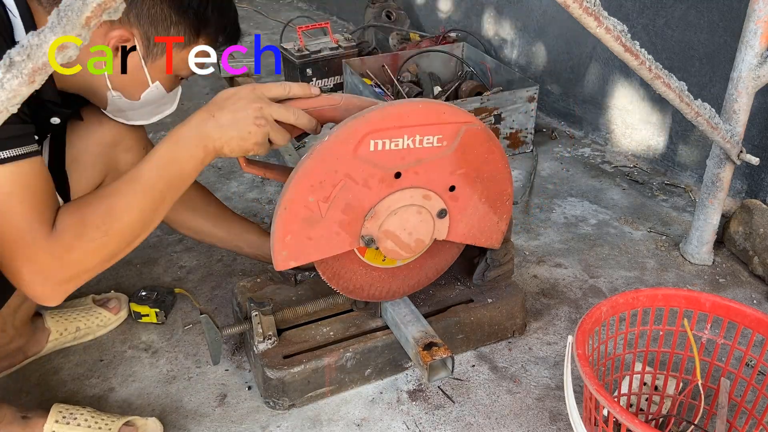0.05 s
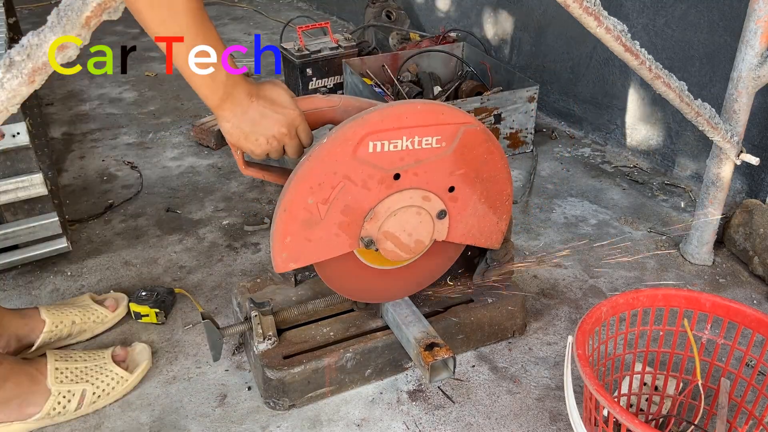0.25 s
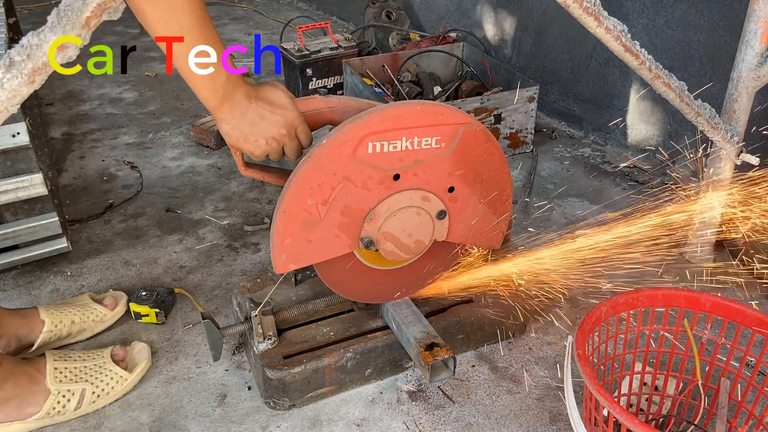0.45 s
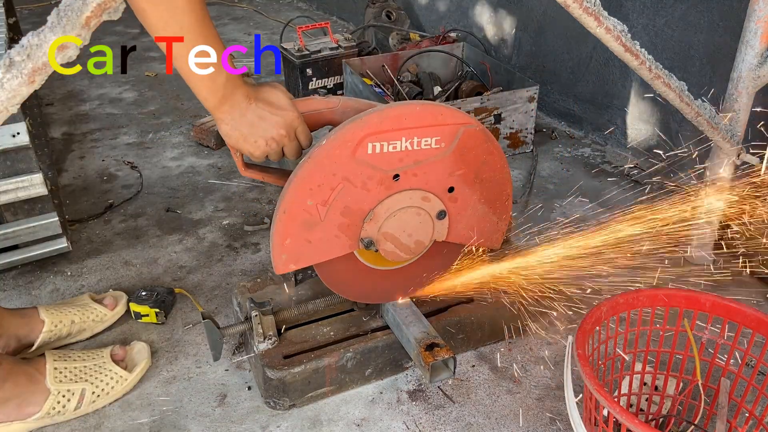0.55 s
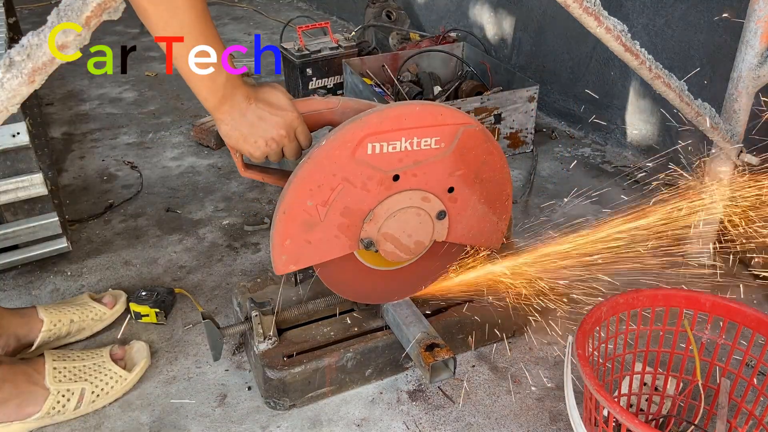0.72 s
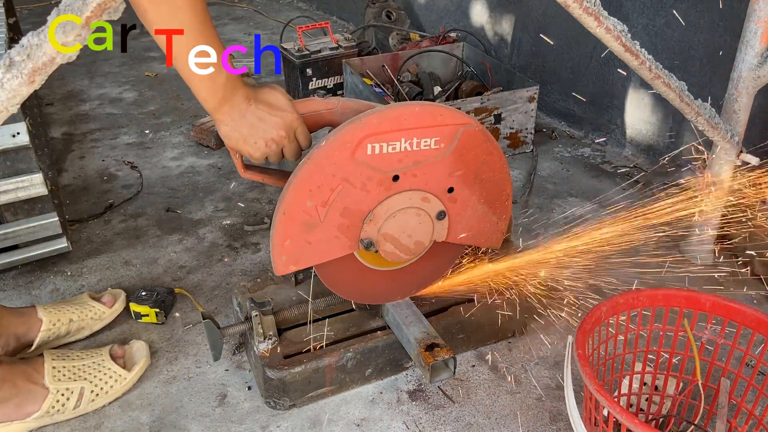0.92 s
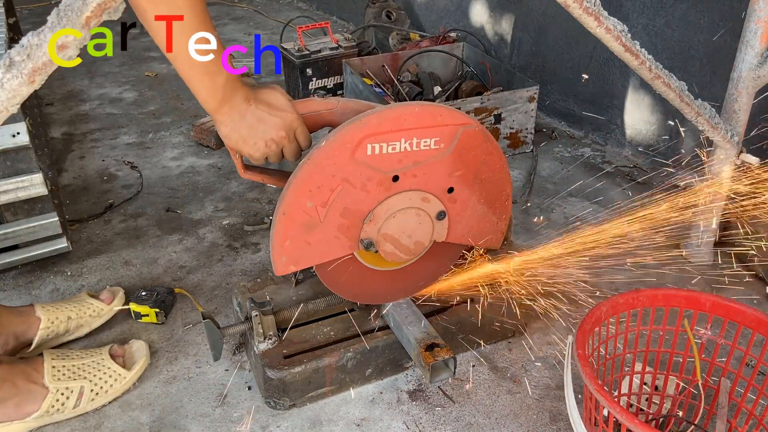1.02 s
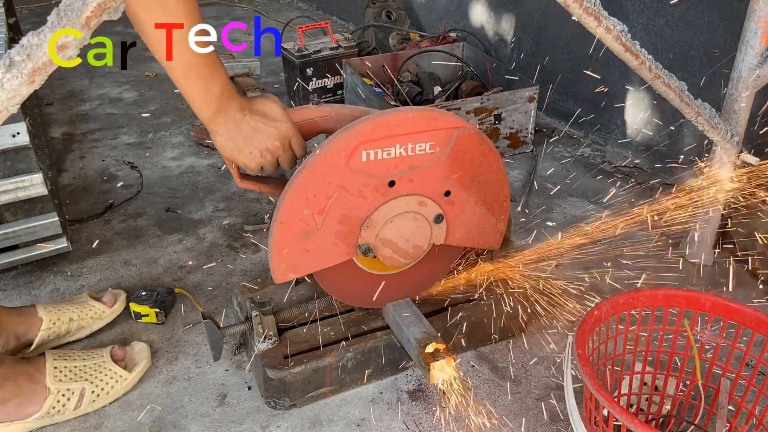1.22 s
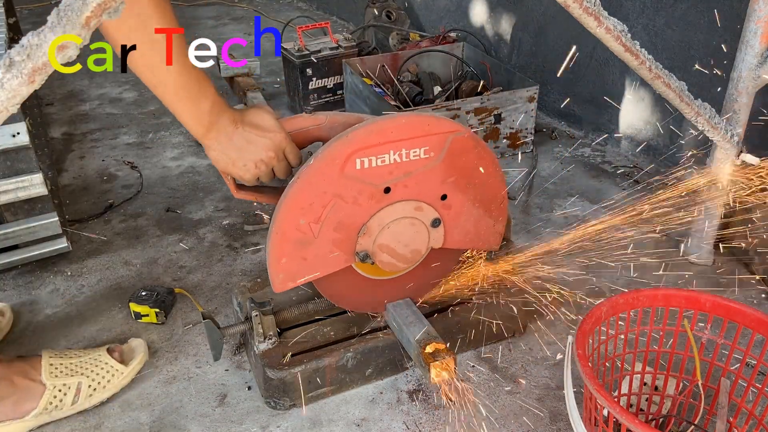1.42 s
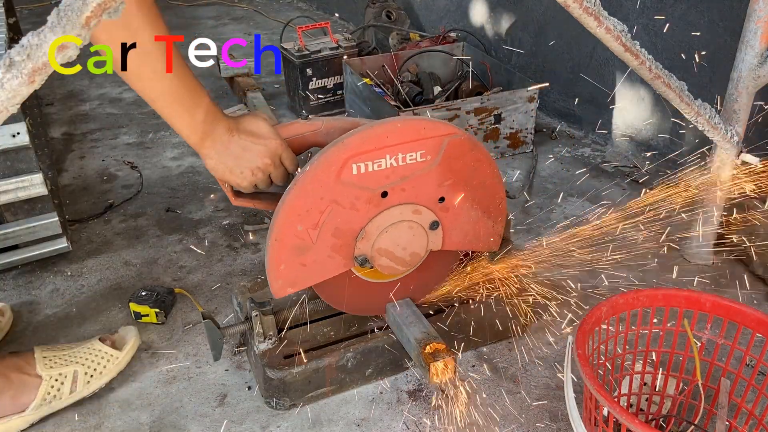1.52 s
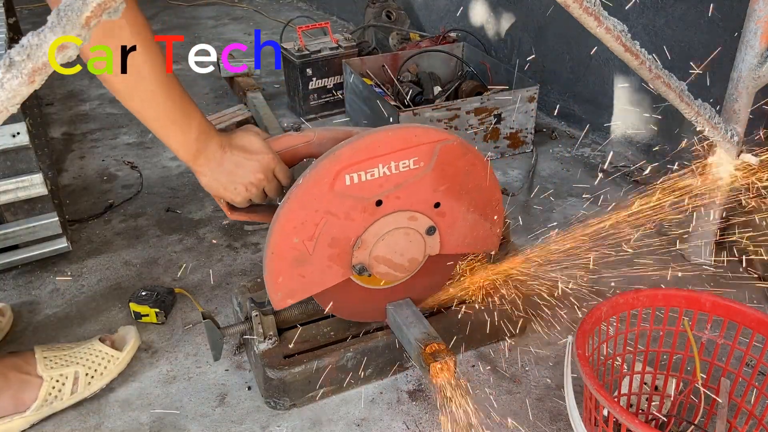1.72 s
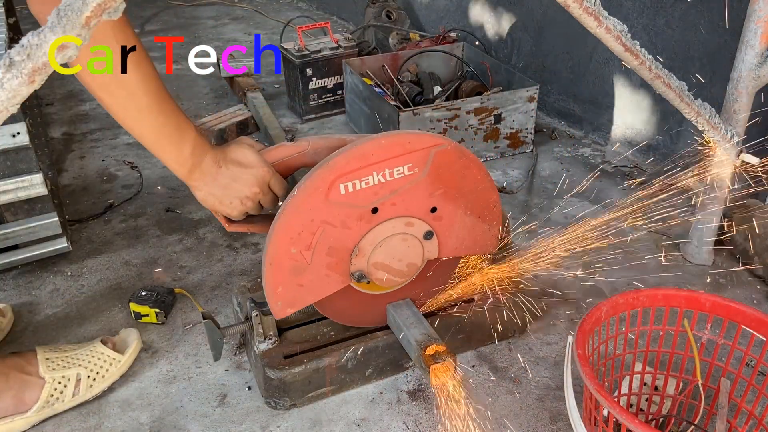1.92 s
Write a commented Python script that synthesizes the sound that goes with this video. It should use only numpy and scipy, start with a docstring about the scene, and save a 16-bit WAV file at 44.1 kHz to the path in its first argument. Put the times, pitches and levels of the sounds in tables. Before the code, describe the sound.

A cut-off saw grinds a steel tube close by in a workshop. After a faint clank, the wheel lands with a rattling bang at 0.2 seconds, then rasps and hisses over a wavering motor buzz and whine. Short squeals come around 0.5 seconds, and the wheel chatters from about 0.9 to 1.2. The cut then continues thinner and quieter, with high squeals and two brief low swells.

```python
"""An abrasive cut-off saw bites into a clamped steel tube on a workshop floor.
After a faint clank the wheel lands with a rattling bang, then grinds: grit hisses and rings the tube.
The drive buzzes and whines at a pitch that sags under load; the wheel squeals in the slot and
chatters near 1 s. A low rumble swells twice. Once the top wall is through, the cut is thinner and quieter."""
import sys
import numpy as np
from scipy import signal
from scipy.fft import rfft, irfft
from scipy.io import wavfile

SR = 44100
rng = np.random.default_rng(int(sys.argv[2]) if len(sys.argv) > 2 else 0)


def wav_out(sig):
    """Save sig, one row per channel (or a flat mono array), as 16-bit PCM at SR to the path in sys.argv[1]."""
    wavfile.write(sys.argv[1], SR, np.round(np.clip(np.atleast_2d(sig).T, -1, 1) * 32767).astype(np.int16))


N = 85995
TIME_S = np.arange(N) / SR
BINS_HZ = np.maximum(np.arange(N // 2 + 1) * SR / N, 1)

# stereo width (frequency [Hz], side gain [dB])
SIDE_SPECTRUM = [(60, -20), (250, -21.5), (500, -16.5), (1000, -12), (2000, -6.5), (4000, -9), (8000, -6.5),
                 (14000, -7.5)]
# workshop noise (frequency [Hz], gain [dB])
SHOP_SPECTRUM = [(18, -63), (30, -30), (189, -6.5), (404, -5.5), (473, -16), (584, -2.5), (760, -18.5),
                 (844, -8), (1070, -15), (4080, -21), (16000, -31.5)]
# crack of a blow (frequency [Hz], gain [dB])
CRACK_SPECTRUM = [(30, -48), (120, -46), (350, -19), (700, -11.5), (1500, -3.5), (2700, 2), (5200, -12.5),
                  (7500, -7), (10000, -10), (16000, -18)]
# modes of tube and saw frame (frequency [Hz], bandwidth [Hz], gain [dB])
TUBE_MODES = [(752, 25, -9), (950, 44, -8), (1394, 32, -1), (1855, 150, -5), (1932, 210, -1.5),
              (2593, 97, -0.5), (2789, 102, 0), (2953, 74, -5), (3315, 61, 0), (4150, 330, -9),
              (4790, 220, -2.5), (5180, 45, 0), (5640, 270, -4), (7520, 180, -6)]
# blows of the landing wheel (time [s], relative level [dB])
LANDING_BLOWS = [(0.2015, -4), (0.2026, 3.5), (.2049, -3), (0.2084, -1), (0.2096, 0), (0.2122, -4),
                 (0.219, -14), (0.2209, -1.5), (0.2264, -17), (0.2317, -15), (0.2385, -4), (.2545, -26)]
# drive knocking the wheel on the tube (time [s], rate [Hz])
KNOCK_RATE = [(.2, 191.3), (.3, 194.8), (.385, 206.3), (.45, 205.6), (.55, 197.6), (.66, 195.9),
              (.8, 192.8), (.89, 195.5), (1.03, 199.8), (1.1, 200.2), (1.2, 198.1), (1.28, 189.9),
              (1.364, 198.2), (1.45, 203.1), (1.61, 194.6), (1.7, 196.3), (1.95, 177.8)]
# rasp and ring (time [s], relative level [dB])
GRIND_ENVELOPE = [(0.25, -24), (0.268, -24), (0.32, -26.5), (0.362, -25.5), (0.406, -29.5), (0.632, -31),
                  (0.646, -32), (0.856, -30.5), (0.874, -37), (0.908, -26.5), (0.94, -34.5), (1.092, -32.5),
                  (1.304, -38.5), (1.32, -37), (1.376, -43.5), (1.542, -43.5), (1.664, -45), (1.95, -39)]
# rasp (frequency [Hz], gain [dB])
RASP_SPECTRUM = [(150, -30), (330, -22), (700, -12), (1050, -17), (1400, -1.5), (2800, -3.5), (4000, -0.5),
                 (5000, 5), (5700, 0), (6400, -5), (9000, -4)]
# treble hiss (time [s], relative level [dB])
HISS_ENVELOPE = [(0.25, -53), (0.272, -50), (0.286, -27), (0.42, -32.5), (0.466, -34), (0.95, -35),
                 (1.12, -33), (1.428, -39), (1.5, -37), (1.95, -38)]
# treble hiss (frequency [Hz], gain [dB])
HISS_SPECTRUM = [(3000, -49.5), (6000, -11), (7300, -5.5), (8500, -3), (9500, 0.5), (10800, -0.5),
                 (13000, -6), (14300, 3), (15700, 0)]
# rumble under the cut (time [s], relative level [dB])
RUMBLE_ENVELOPE = [(.2, -57), (.25, -59), (.33, -44.5), (.45, -64.5), (.95, -64.5), (1.18, -54),
                   (1.27, -47), (1.33, -42.5), (1.38, -50), (1.46, -51), (1.56, -50), (1.63, -51),
                   (1.8, -57), (1.95, -68)]
# rumble under the cut (frequency [Hz], gain [dB])
RUMBLE_SPECTRUM = [(25, -50), (100, -28), (150, -15), (190, -9.5), (260, -9.5), (450, -7.5), (700, -9),
                   (1500, -22.5)]
# motor hum at twice the knock rate (time [s], level [dB])
HUM_ENVELOPE = [(.2, -37), (.22, -41), (.25, -53.5), (.35, -51.5), (.45, -56), (.8, -54.5), (1.18, -53.5),
                (1.25, -78), (1.5, -60), (1.57, -56.5), (1.64, -73), (1.95, -82)]
# drone at the knock rate (time [s], level [dB])
DRONE_ENVELOPE = [(.2, -66), (.45, -75), (.85, -73), (1.2, -72), (1.265, -49), (1.34, -68), (1.48, -67.5),
                  (1.565, -49), (1.63, -75), (1.95, -88)]
# drive buzz (time [s], level [dB])
BUZZ_ENVELOPE = [(.25, -43), (.4, -38.5), (.5, -34), (.62, -33), (.76, -36.5), (.92, -35), (1.2, -39),
                 (1.31, -43), (1.37, -48), (1.55, -50), (1.7, -50.5), (1.95, -61)]
# drive harmonics (multiple of knock rate, weight in buzz [dB], weight in chatter [dB])
HARMONICS = [(3, -18, -21), (4, -10, -14), (5, -15.5, -18), (6, -5.5, -17), (7, -5.5, -8.5), (8, -5, -3.5),
             (9, -1.5, -13), (10, -2.5, -1), (11, -4, -12), (12, -7.5, -4.5), (13, -3.5, 2), (14, 1.5, -33),
             (15, -12, -5), (16, -2, -9), (17, -7, 5), (19, -5, -5), (23, -16, -3.5), (24, -2, -20),
             (28, 0.5, 1), (30, -4.5, -2), (34, -11, -6.5), (39, -31, -5)]
# wheel resonances (frequency [Hz], bandwidth [Hz], gain [dB])
WHEEL_MODES = [(9070, 730, 5.5), (10200, 280, 13), (11730, 200, 8.5), (13340, 130, -14.5)]
# high partials (time [s], level re HISS_ENVELOPE [dB])
SINGING_ENVELOPE = [(.25, -13), (.4, -9), (.8, -10), (1.2, -4.5), (1.45, -9.5), (1.95, -6.5)]
# whines, silent where start > end (start [s], end [s], multiple of knock rate, level [dB])
WHINE_SPELLS = [(0.32, 1.1, 49, -42), (.98, 1.21, 49, -39.5), (.68, 0.83, 48, -42.5),
                (.34, 0.46, 70, -35.5), (0.657, 0.96, 74, -41), (1.0, 1.3, 71, -46),
                (1.47, 1.558, 57.5, -42), (1.1, 1.9, 68, -52), (2.1, 1.88, 76, -59), (2.4, 1.97, 73, -52),
                (1.6, 1.8, 28, -50.5), (1.17, 1.29, 4, -50)]
# wheel squeals (start [s], end [s], frequency [Hz], level [dB])
SQUEAL_SPELLS = [(0.471, 0.489, 2650, -31), (0.543, .63, 2580, -38.5), (0.614, 0.64, 2760, -30),
                 (1.236, 1.27, 10050, -44), (1.31, 1.339, 2700, -42), (1.37, 1.422, 11540, -45),
                 (1.524, 1.551, 2600, -47.5), (1.526, 1.706, 10000, -44.5), (1.845, 1.872, 9950, -41),
                 (1.919, 1.97, 10130, -58)]
# low swells (start [s], end [s], level [dB])
SWELL_SPELLS = [(1.206, 1.274, -45), (1.483, 1.577, -46.5)]
# low swells (frequency [Hz], gain [dB])
SWELL_SPECTRUM = [(25, -40), (70, -20), (130, -11), (200, 2), (450, 0), (900, -3.5), (1800, -5),
                  (4000, -35)]

BITE_S, BITE_RISE_S = 0.202, 0.004
CHATTER_START_S, CHATTER_END_S, CHATTER_FADE_S = 0.94, 1.208, 0.15
FLUTTER_HZ, JITTER_HZ, WANDER_HZ = 40, 36.9, 21


def from_db(db):
    """Decibels to gain."""
    return 10 ** (np.asarray(db) / 20)


def unit_rms(x):
    """Scale to unit rms."""
    return x / np.sqrt(np.mean(x ** 2) + 1e-20)


def curve(rows):
    """Interpolate (time [s], value) rows."""
    return np.interp(TIME_S, *np.transpose(rows))


def shape(x, spectrum):
    """Filter by (frequency [Hz], gain [dB]) rows."""
    hz, db = np.transpose(spectrum)
    return irfft(rfft(x) * from_db(np.interp(np.log(BINS_HZ), np.log(hz), db)), N)


def noise(spectrum):
    """Two independent shaped noises."""
    return unit_rms(shape(rng.standard_normal((2, N)), spectrum))


def drift(corner_hz, points=2048):
    """Slow random signal, rms about 1."""
    rolloff = 1 + (BINS_HZ[:points // 2 + 1] / corner_hz) ** 2
    slow = irfft(rfft(rng.standard_normal(points)) / rolloff)
    return np.interp(TIME_S, np.linspace(0, TIME_S[-1], points), unit_rms(slow))


def gate(start_s, end_s, fade_s=0.026):
    """Fade in, hold, fade out."""
    return np.clip((TIME_S - start_s) / fade_s + .5, 0, 1) * np.clip((end_s - TIME_S) / fade_s + .5, 0, 1)


def partial(cycles, wander_db):
    """Pair: a sine of wandering level, and its wavering reflection."""
    phase = 2 * np.pi * (cycles + rng.random())
    direct = unit_rms(from_db(wander_db * np.minimum(drift(WANDER_HZ), 1)) * np.sin(phase))
    reflection = drift(WANDER_HZ) * np.sin(phase) + drift(WANDER_HZ) * np.cos(phase)
    return np.array([direct, reflection])


def stereo(pair, room_db):
    """Direct sound to mid, room sound to side."""
    direct, room = pair
    side = from_db(room_db) * shape(room, SIDE_SPECTRUM)
    return np.array([direct + side, direct - side])


def tube(force):
    """Tube and frame ring as parallel resonators of alternating sign."""
    ring = 0
    for k, (hz, width_hz, db) in enumerate(TUBE_MODES):
        radius = np.exp(-np.pi * width_hz / SR)
        b = (1 - radius ** 2) / 2 * np.array([1, 0, -1])
        a = [1, -2 * radius * np.cos(2 * np.pi * hz / SR), radius ** 2]
        ring += (-1) ** k * from_db(db) * signal.lfilter(b, a, force + 1e-18)
    return ring


def workshop(clank_db=-31, decay_s=0.018, ambience_db=-43):
    """Before the cut: a dying clank and dull room noise."""
    metal = unit_rms(noise(CRACK_SPECTRUM) + unit_rms(tube(rng.standard_normal((2, N)))))
    clank = from_db(clank_db) * np.exp(-TIME_S / decay_s) * metal
    return clank + from_db(ambience_db) * noise(SHOP_SPECTRUM) * gate(-1, BITE_S)


def landing():
    """The wheel bounces on the tube: each blow cracks, rings the metal and leaves a room tail."""
    times_s, levels_db = np.transpose(LANDING_BLOWS)
    blows = np.zeros(N)
    blows[(times_s * SR).astype(int)] = from_db(levels_db)

    def bursts(decay_s):
        pole = np.exp(-2 / (decay_s * SR))
        power = signal.lfilter([1 - pole], [1, -pole], blows ** 2 + 1e-18)
        return noise(CRACK_SPECTRUM) * np.sqrt(power)

    ring = from_db(17.5) * tube(np.array([blows, blows * rng.choice([-1, 1], N)]))
    crack = from_db(-4.5) * bursts(decay_s=0.0024)
    tail = from_db(-0.5) * bursts(decay_s=0.038)
    return crack + ring + tail


def rumble():
    """Low noise under the cut."""
    return from_db(curve(RUMBLE_ENVELOPE) - 5.5) * noise(RUMBLE_SPECTRUM)


def grit(cycles, grains_per_s=14000, spread_db=2.5, beat_depth=0.33, flutter_db=1.36):
    """Abrasive grains strike at random, harder on each motor beat."""
    sizes = from_db(spread_db * np.minimum(rng.exponential(1, (2, N)), 5))
    signs = rng.choice([-1, 1], (2, N))
    strikes = rng.random((2, N)) < grains_per_s / SR
    beat = 1 + beat_depth * (np.cos(4 * np.pi * cycles) + .5 * np.cos(2 * np.pi * cycles))
    return sizes * signs * strikes * beat * from_db(flutter_db * drift(FLUTTER_HZ))


def reflect(pair, decay_s=0.02):
    """Floor and walls add a short wash of reflections."""
    wash = rng.standard_normal((2, N)) * np.exp(-TIME_S / decay_s)
    wash /= np.sqrt(np.sum(wash ** 2, axis=1, keepdims=True))
    return pair + signal.fftconvolve(pair, wash, axes=1)[:, :N]


def grinding(cycles):
    """Grit rasps, rings the tube and hisses."""
    rasp = from_db(-3.5) * unit_rms(shape(reflect(grit(cycles)), RASP_SPECTRUM))
    ring = from_db(-6.5) * unit_rms(tube(grit(cycles)))
    hiss = from_db(-2.54) * unit_rms(shape(reflect(grit(cycles)), HISS_SPECTRUM))
    return from_db(curve(GRIND_ENVELOPE)) * (rasp + ring) + from_db(curve(HISS_ENVELOPE)) * hiss


def drive(cycles, roughness=0.26):
    """Hum, drone, buzz and whine follow motor speed; the buzz gives way during chatter."""
    hum = from_db(curve(HUM_ENVELOPE)) * partial(2 * cycles, wander_db=3)
    drone = from_db(curve(DRONE_ENVELOPE)) * partial(cycles, wander_db=6.5)
    buzz = sum(from_db(db) * partial(k * cycles, wander_db=5.5) * (1 + roughness * drift(FLUTTER_HZ))
               for k, db, _ in HARMONICS)
    duck = 1 - gate(CHATTER_START_S, CHATTER_END_S, CHATTER_FADE_S)
    whine = sum(from_db(db) * gate(start_s, end_s) * partial(k * cycles, wander_db=1)
                for start_s, end_s, k, db in WHINE_SPELLS)
    return hum + drone + from_db(curve(BUZZ_ENVELOPE)) * duck * unit_rms(buzz) + whine


def singing(cycles):
    """High drive partials glide through the wheel's resonances."""
    tones, knock_hz = 0, curve(KNOCK_RATE)
    for k in range(32, 82):
        gain_db = sum(db / (1 + (2 * (k * knock_hz - hz) / width_hz) ** 2)
                      for hz, width_hz, db in WHEEL_MODES)
        tones += from_db(gain_db) * partial(k * cycles, wander_db=4)
    return from_db(curve(SINGING_ENVELOPE) + curve(HISS_ENVELOPE)) * unit_rms(tones)


def squeals(waver_hz=25):
    """The wheel rubs the slot walls: short, nearly pure tones."""
    tones = 0
    for start_s, end_s, hz, db in SQUEAL_SPELLS:
        cycles = np.cumsum(hz + waver_hz * drift(JITTER_HZ)) / SR
        tones += from_db(db) * gate(start_s, end_s) * partial(cycles, wander_db=3)
    return tones


def chatter(cycles, level_db=-32, slip_cycles=0.0027, roughness=0.1, rough_hz=122):
    """The wheel hammers the cut: one sharp, uneven knock per cycle, harmonics in phase."""
    cycles = cycles + slip_cycles * drift(rough_hz)
    knocks = unit_rms(sum(-from_db(db) * np.cos(2 * np.pi * k * cycles) for k, _, db in HARMONICS))
    echo = unit_rms(sum(from_db(db) * partial(k * cycles, wander_db=1) for k, _, db in HARMONICS))
    force = from_db(level_db) * gate(CHATTER_START_S, CHATTER_END_S, CHATTER_FADE_S)
    force *= 1 + roughness * drift(rough_hz)
    return force * np.array([knocks + 0.55 * echo[0], echo[1]])


def swells():
    """Two brief swells of low noise."""
    envelope = sum(from_db(db) * gate(start_s, end_s) for start_s, end_s, db in SWELL_SPELLS)
    return envelope * noise(SWELL_SPECTRUM)


def scene(jitter=0.002327, low_cut_hz=162, balance_db=0.08):
    """The saw lands and cuts; grit, drive and chatter share one knock phase."""
    cycles = np.cumsum(curve(KNOCK_RATE) * (1 + jitter * drift(JITTER_HZ))) / SR
    contact = np.clip((TIME_S - BITE_S) / BITE_RISE_S, 0, 1)
    cut = stereo(rumble() + grinding(cycles), room_db=0.5)
    cut += stereo(drive(cycles) + singing(cycles) + squeals(), room_db=-0.5)
    cut += stereo(chatter(cycles), room_db=-1)
    mix = signal.sosfilt(signal.butter(6, low_cut_hz, "high", fs=SR, output="sos"), contact * cut)
    mix += stereo(swells(), room_db=1.5)
    mix += stereo(landing(), room_db=0.5)
    mix += stereo(workshop(), room_db=7)  # more diffuse than the saw
    return mix * from_db([[balance_db], [-balance_db]])


def record(dry):
    """Soft clip, then a steep low-pass."""
    cutoff_hz = 15650
    clipped = 0.86 * np.tanh(dry / 0.74)
    return signal.sosfilt(signal.ellip(12, .1, 80, cutoff_hz, fs=SR, output="sos"), clipped)


dry = scene()
out = record(dry)
wav_out(out)
```